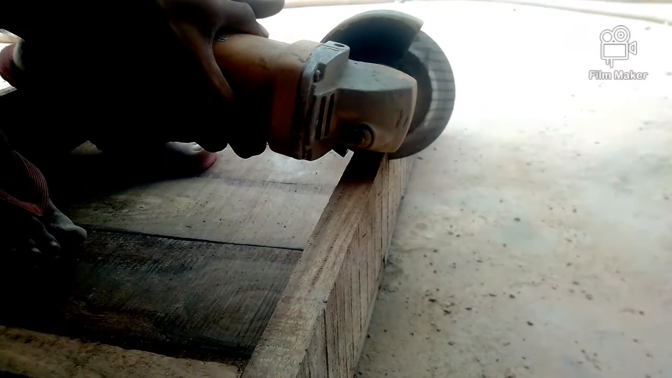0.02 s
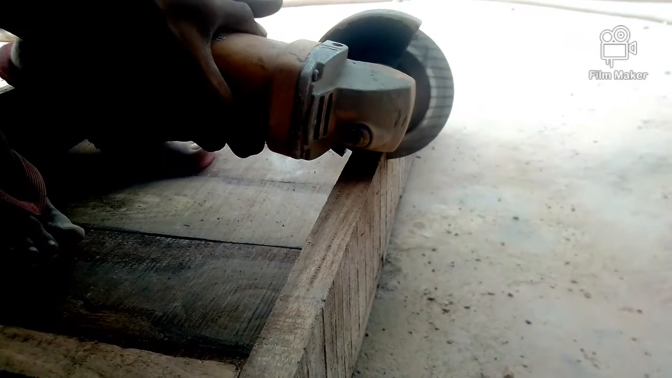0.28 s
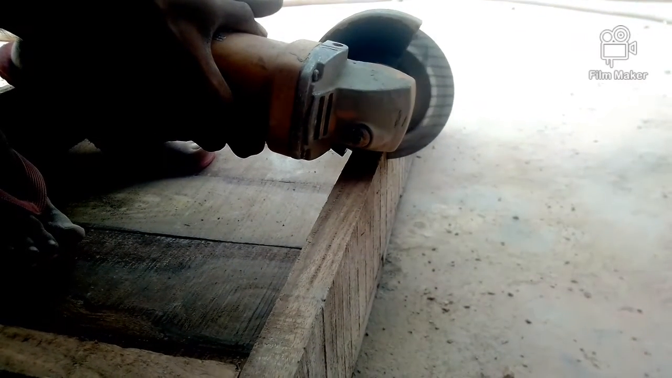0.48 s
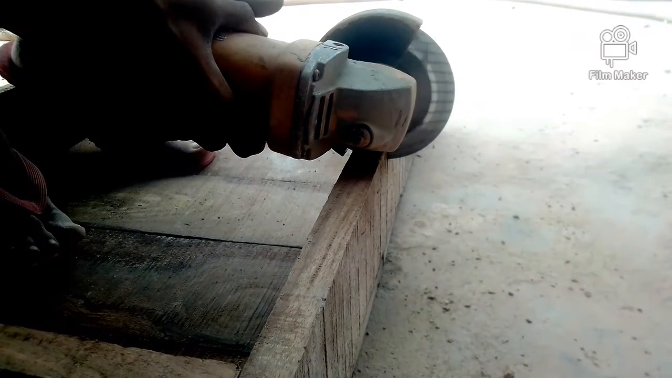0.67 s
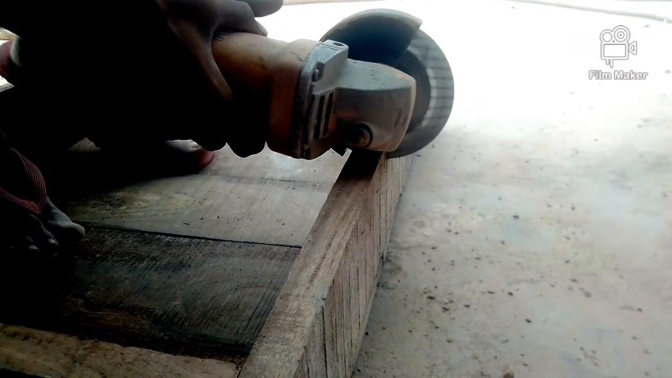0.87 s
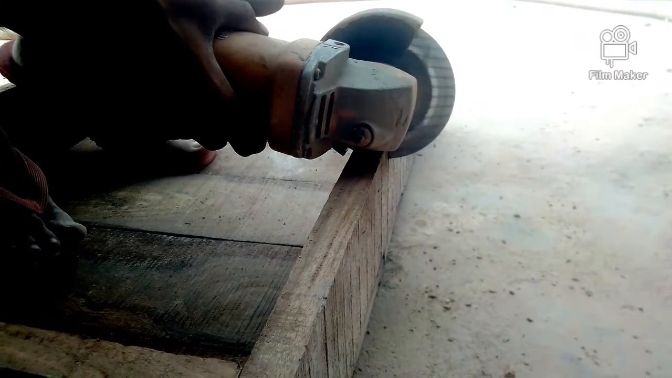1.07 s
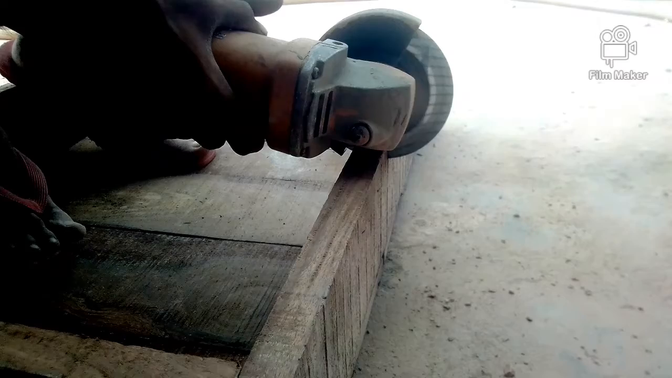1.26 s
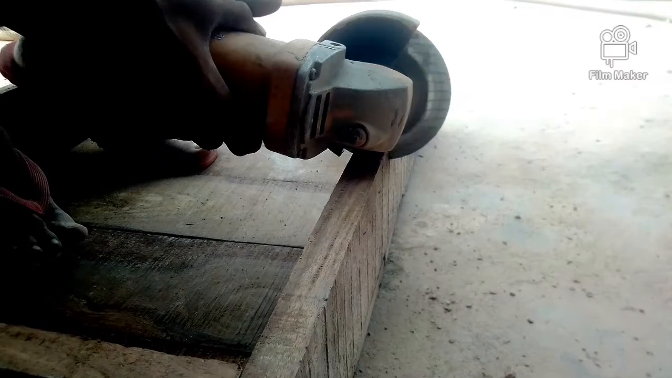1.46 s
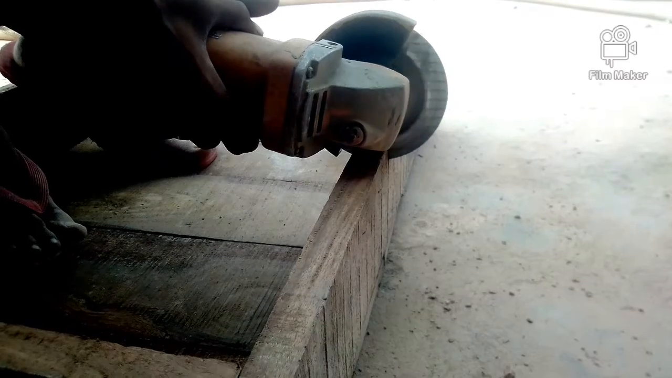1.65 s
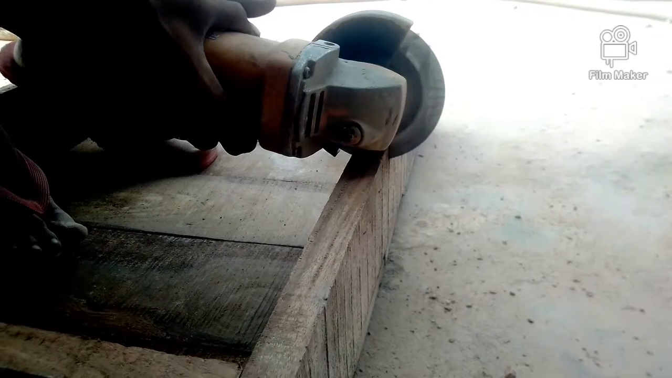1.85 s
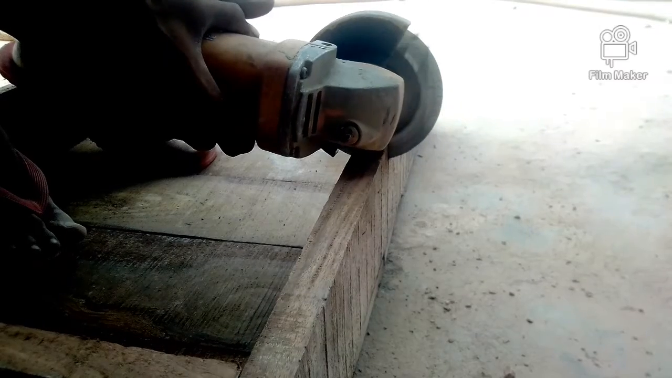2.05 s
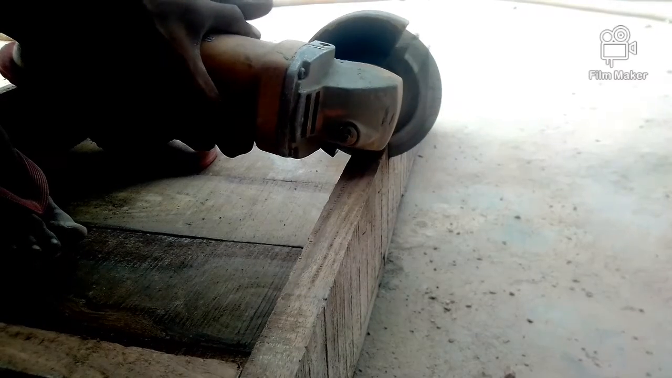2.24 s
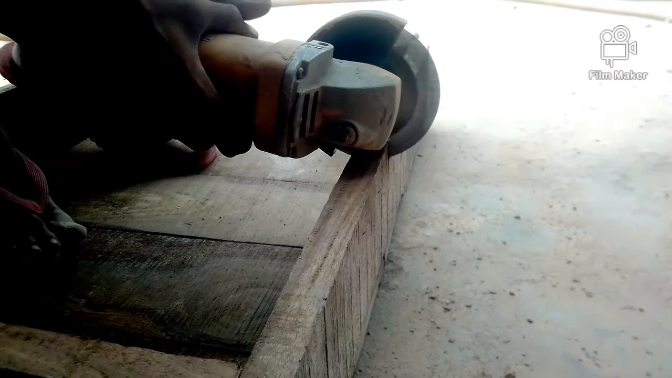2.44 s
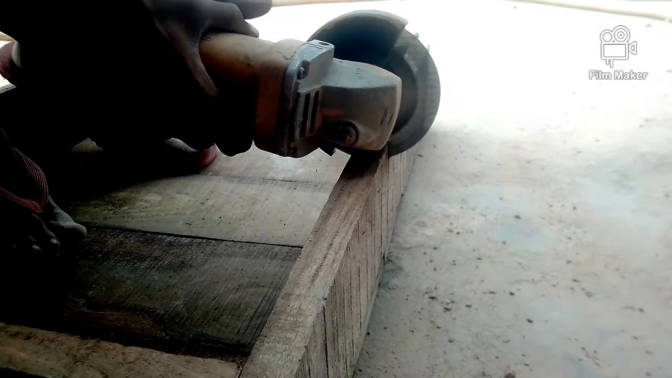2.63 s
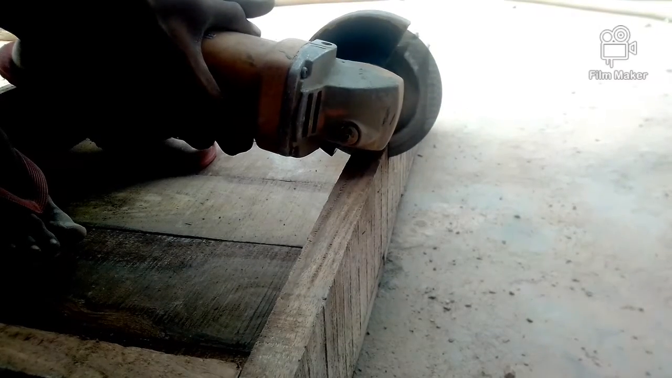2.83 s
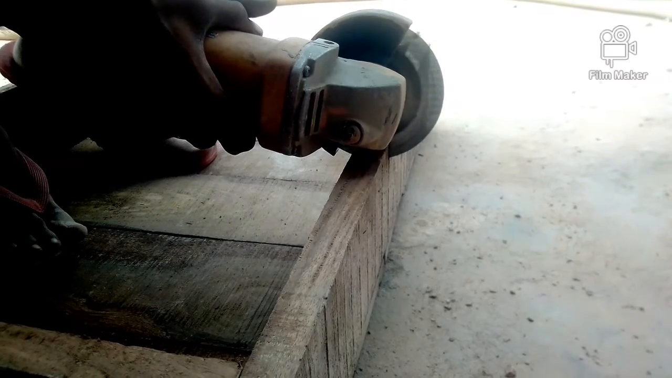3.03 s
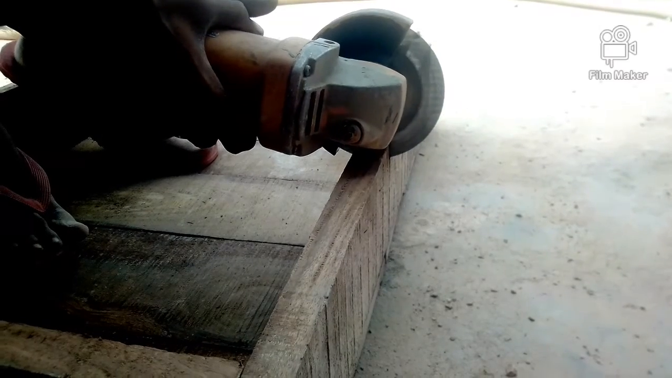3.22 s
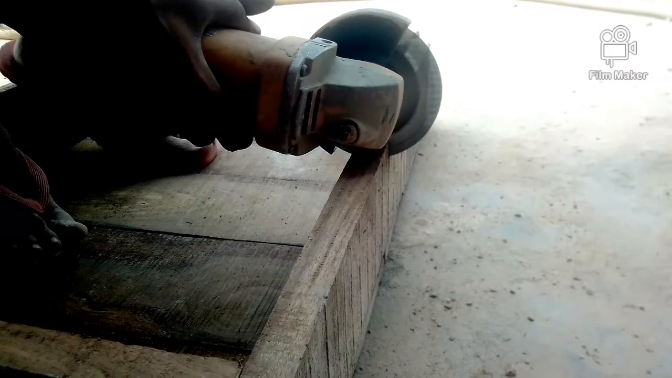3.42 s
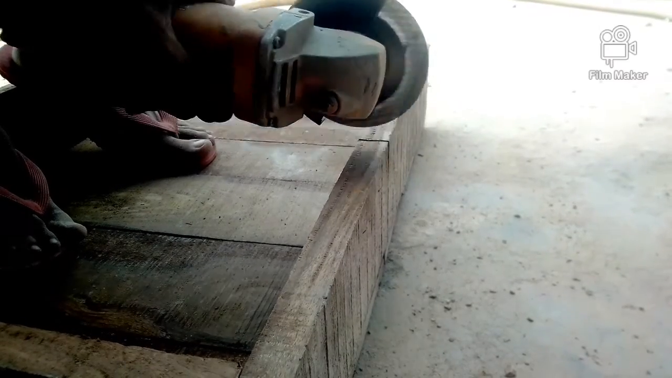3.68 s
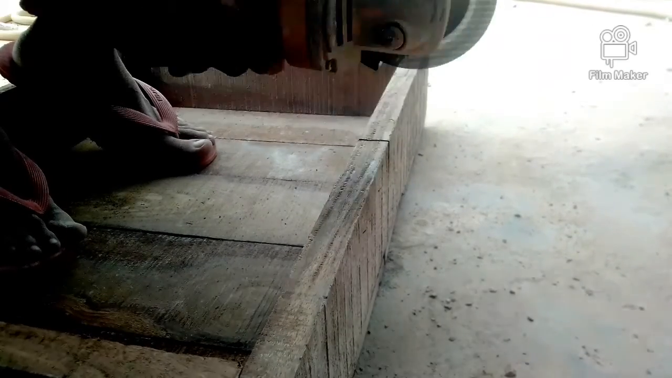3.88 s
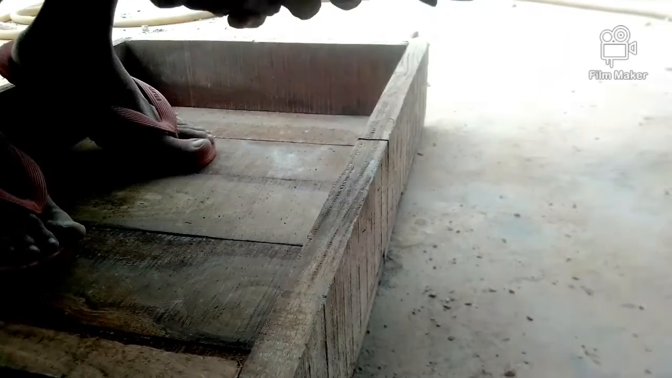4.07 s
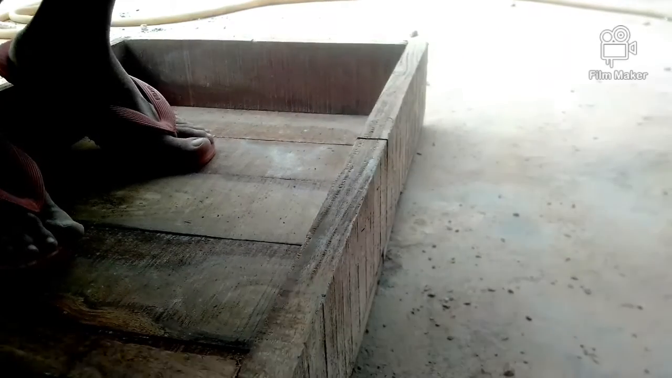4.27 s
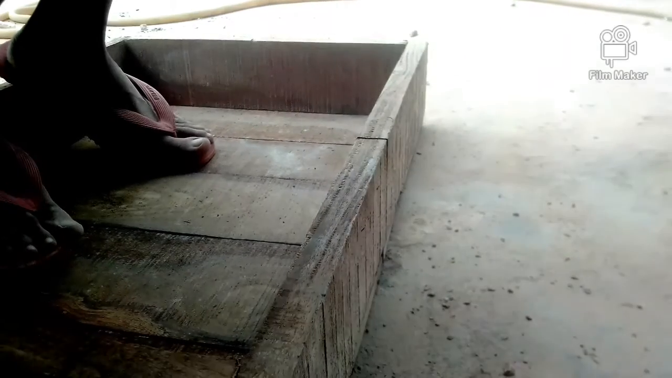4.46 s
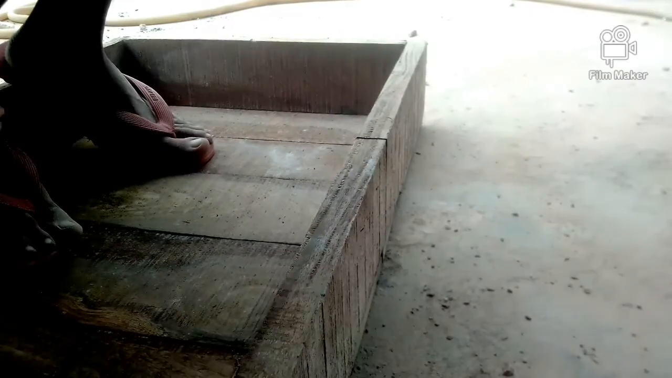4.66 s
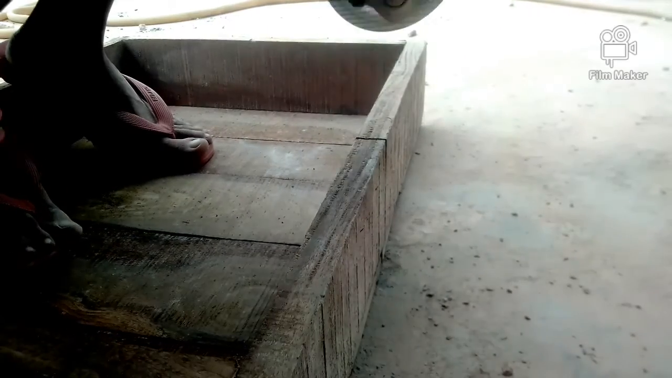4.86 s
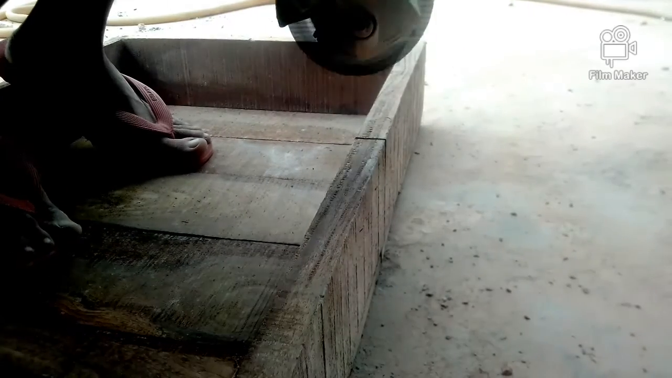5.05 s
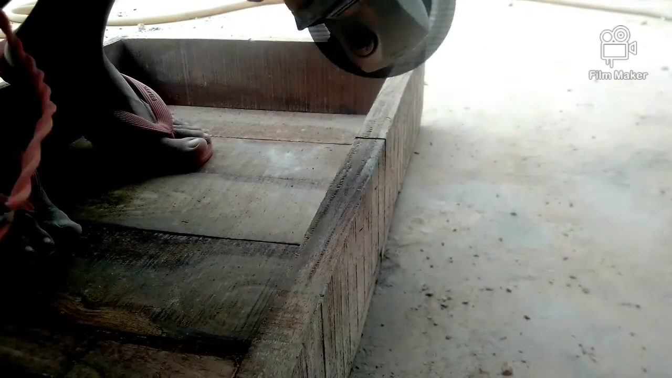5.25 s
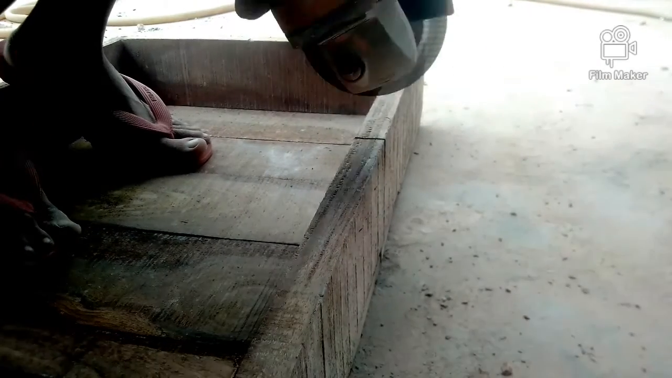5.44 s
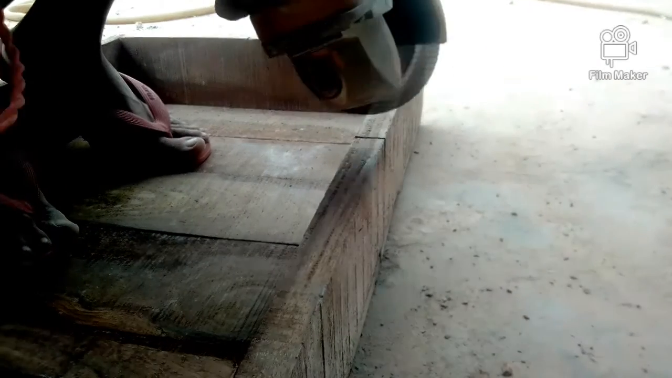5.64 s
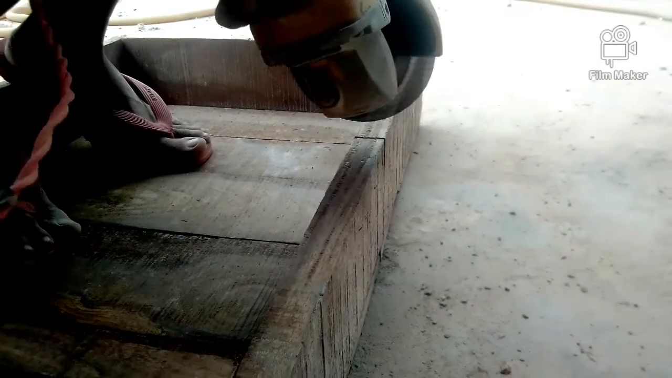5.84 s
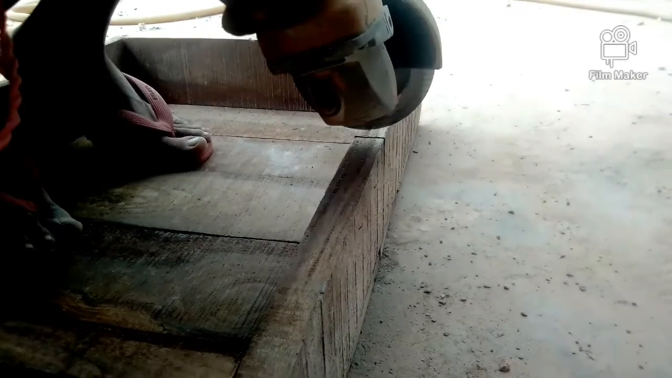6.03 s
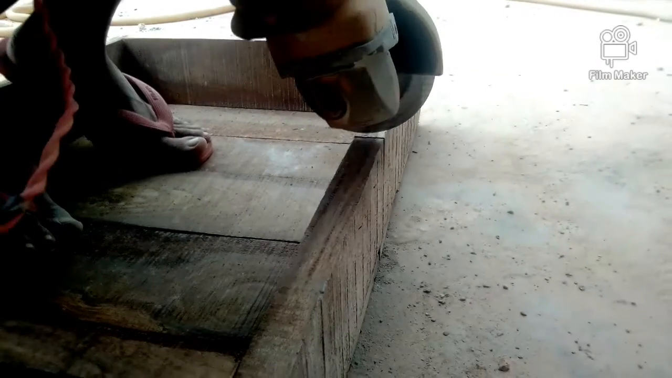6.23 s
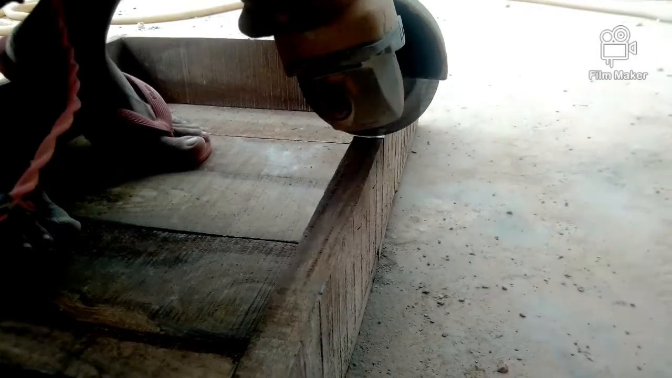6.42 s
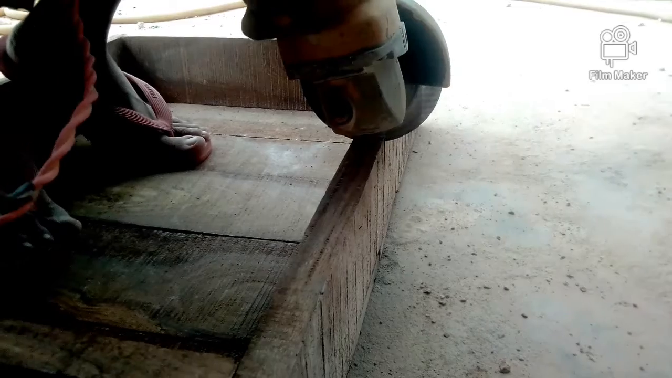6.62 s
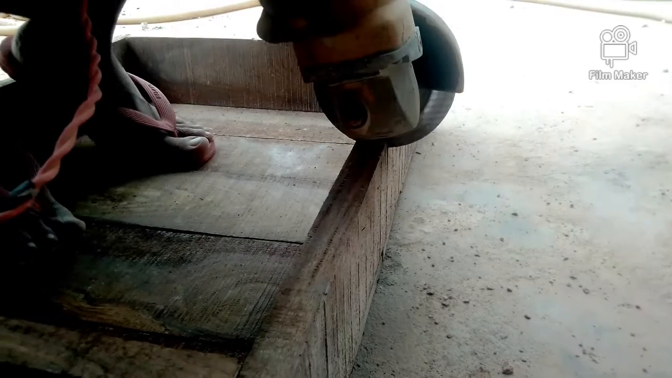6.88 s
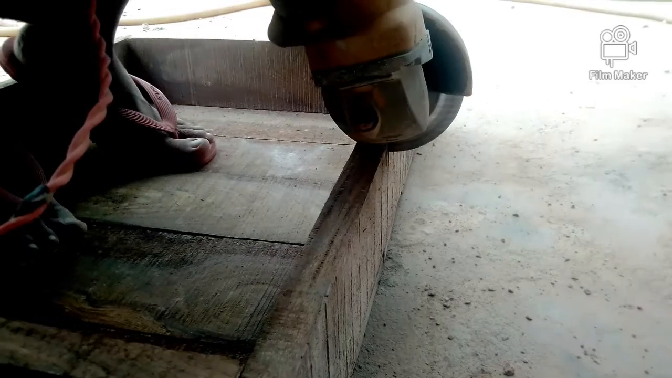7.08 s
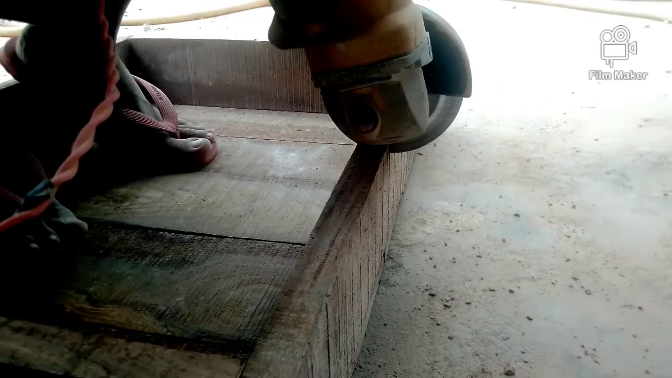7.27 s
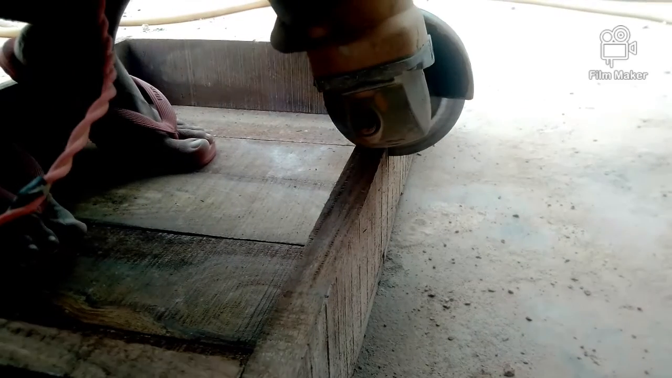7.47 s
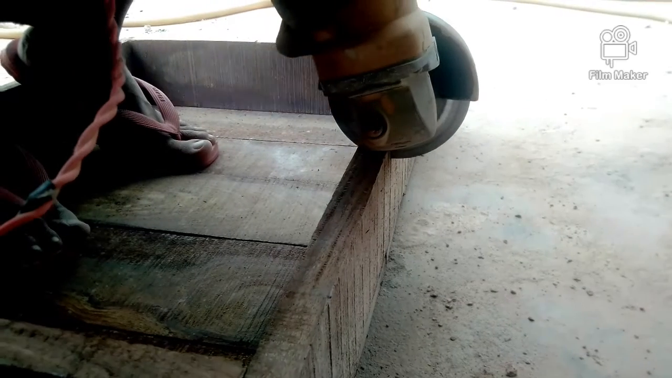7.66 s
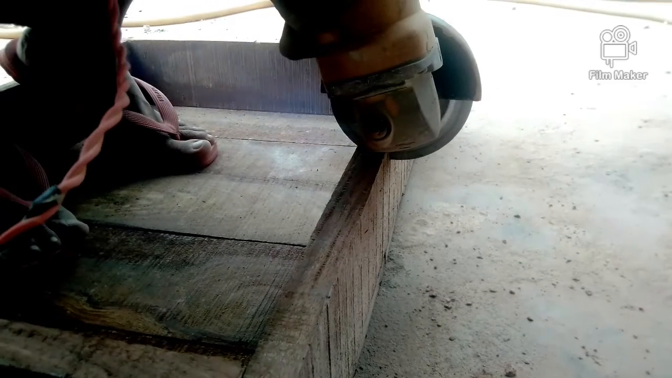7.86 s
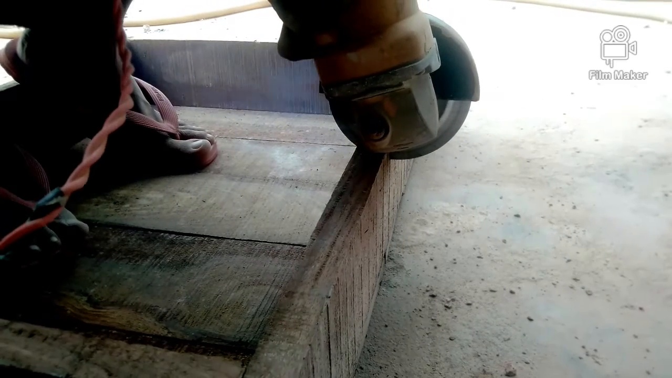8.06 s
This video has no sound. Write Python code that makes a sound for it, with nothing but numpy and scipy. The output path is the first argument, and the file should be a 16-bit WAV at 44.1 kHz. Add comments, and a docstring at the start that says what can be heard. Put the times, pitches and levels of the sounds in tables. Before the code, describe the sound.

Shrill, buzzing grinder cut in wood, a quick metallic ring as the disc lets go, airy free spinning, then a louder scraping bite sinking in pitch.

```python
"""An angle grinder finishes a cut in the edge of a wooden box, is lifted, runs free and bites again.
The rim meets the wood in nearly the same way each turn, so the scrape carries the shaft's multiples;
that force excites the modes of the steel disc and the thrum of the boards. Clean shaft tones swell as they
cross resonances of box and tool. Fan and gears hiss throughout as shaped noise, and the released disc
rings on as decaying sines. The input overloads softly."""
import sys
import numpy as np
from scipy import signal
from scipy.fft import rfft, irfft, next_fast_len
from scipy.io import wavfile
from scipy.ndimage import uniform_filter1d, map_coordinates

SR = 44100
rng = np.random.default_rng(int(sys.argv[2]) if len(sys.argv) > 2 else 0)


def master_out(mix):
    """Clip the mix to full scale and print it as 16-bit PCM to the path in sys.argv[1]."""
    frames = np.transpose(np.atleast_2d(mix))
    ceiling = np.clip(frames, -1, 1)
    pcm = np.round(ceiling * 32767).astype(np.int16)
    wavfile.write(sys.argv[1], SR, pcm)


N = 357210
T = np.arange(N) / SR

# contact of rim and wood, one table a cut: t/s, bite level/dB, shaft-tone level/dB
CUTS = [
    [(0, -14.5, -2.5), (.5, -13, -6.5), (1.02, -12.5, -5.5), (1.25, -14.5, -4), (1.55, -11, -1.5),
     (1.72, -12.5, -3), (2.1, -12.5, -2.5), (2.5, -14, -4), (2.85, -11, -6), (3.2, -10, -5.5),
     (3.42, -13.5, -4), (3.55, -11.5, -3.5), (3.68, -12.5, -21), (3.75, -13, -26), (3.775, -26, -40)],
    [(6.585, -32, -40), (6.605, -10.5, -34), (6.85, -9, -9), (7.08, -3, 10), (7.3, -5, 0), (7.6, -5, 3.5),
     (7.82, -8, 2), (8.1, -9, 0)],
]


def gain_of(db):
    """Amplitude ratio of a level difference in dB."""
    return 10 ** (np.asarray(db) / 20)


def evened(x):
    """Normalisation to rms 1."""
    return x / np.sqrt(np.mean(x ** 2) + 1e-20)


def white():
    """White noise: equal mean power at all frequencies, rms 1."""
    return rng.standard_normal(N)


def columns(tables, silent):
    """Piecewise-linear interpolation in time; outside the tables every column takes the value silent."""
    out = np.full((len(tables[0][0]) - 1, N), float(silent))
    for rows in tables:
        s, *values = np.transpose(rows)
        inside = (T >= s[0]) & (T <= s[-1])
        out[:, inside] = [np.interp(T[inside], s, v) for v in values]
    return out


def colour(x, points):
    """Spectral shaping: levels interpolated on a log-frequency axis weight the spectrum; rms 1 results."""
    f, db = np.transpose(points)
    size = next_fast_len(N)
    hz = np.fft.rfftfreq(size, 1 / SR)
    weight = gain_of(np.interp(np.log(hz + 1), np.log(f), db))
    spectrum = rfft(evened(x), size)
    return evened(irfft(spectrum * weight, size)[:N])


def ring(x, hz, width):
    """Resonance by heterodyning: shift the mode to zero, smooth twice, shift back; white noise keeps its rms."""
    turn = np.exp(2j * np.pi * np.cumsum(hz * np.ones(N)) / SR)  # hz may glide
    r = np.exp(-2.2 * np.pi * abs(width) / SR)
    norm = np.sqrt(2 * (1 - r * r) ** 3 / (1 + r * r))
    smoothed = signal.lfilter([1], [1, -2 * r, r * r], x / turn)
    return norm * (turn * smoothed).real


def flutter(hz):
    """Random modulation: white noise through a one-pole low-pass with its corner at hz, set to rms 1."""
    return evened(signal.lfilter([1], [1, -np.exp(-2 * np.pi * hz / SR)], white()))


def bumps(rows):
    """Sum of Gaussian rises in level (dB)."""
    return sum(db * np.exp(-((T - s) / length * 2) ** 2) for s, length, db in rows)


def grip(*stage_db):
    """Coupling to the wood: gain at four stages (deep in the slot, easing out, entering, bogged down)."""
    changes_s = (1.7, 2.3, 4, 5, 7.1, 7.4)  # three changes of grip, each from, to
    return gain_of(np.interp(T, changes_s, np.repeat(stage_db, 2)[1:-1]))


def tones(per_turn, angle):
    """Shaft harmonics: one sine of rms 1, in random phase, for each count of beats a turn."""
    phase = rng.random((len(per_turn), 1))
    return np.sqrt(2) * np.sin(2 * np.pi * (np.outer(per_turn, angle) + phase))


def pattern(rows, angle):
    """Periodic forcing: sines that repeat a whole number of times each turn."""
    per_turn, db = np.transpose(rows)
    return gain_of(db) @ tones(np.round(per_turn), angle)


def rim(angle, count=384):
    """Rotational periodicity: rim roughness is read once a turn and wears a little between turns."""
    fresh = rng.standard_normal((1400, count))  # turns, points round the rim
    worn = signal.lfilter([1], [1, -.955], fresh, axis=0)[100:]
    # slow variation round the rim is weakened, leaving the low multiples to the shaft tones
    worn = worn - 0.52 * uniform_filter1d(worn, size=24, axis=1, mode="wrap")
    return evened(map_coordinates(worn.ravel(), [angle * count], order=3))


def contact_force(angle):
    """Excitation at the contact: partly repeating roughness, partly fresh noise, plus rim and gear patterns."""
    # the harder the disc is pressed, the more alike its turns:
    # t/s, share of the rough force's power that repeats each turn (0-1)
    repeat = [(0, .6), (1.2, .6), (1.4, .75), (1.7, .7), (2.1, .3), (3.8, .2), (6.6, .3), (7, .55),
              (7.3, .8), (8.1, .85)]
    # rim patterns that stand out while the disc sits steady in the slot: beats a turn, level/dB
    seated = [(7, -18), (9, -17.5), (12, -16), (15, -22.5), (20, -22), (22, -20.5), (24, -16), (28, -22),
              (29, -22.5), (31, -14.5), (32, -28), (34, -32.5), (38, -24), (44, -19), (46, -25), (47, -28),
              (48, -14), (54, -15)]
    # gear and rim patterns that stand out as the motor bogs down: beats a turn, level/dB
    bogging = [(20, -12.5), (28, -30), (29, -16.5), (27, -25), (30, -16), (32, -33), (35, -23), (39, -17),
               (40, -19.5), (45, -20), (47, -27), (49, -21)]
    share = np.interp(T, *np.transpose(repeat))
    force = np.sqrt(share) * rim(angle) + np.sqrt(1 - share) * white()
    force += np.interp(T, (7.12, 7.55), [0, 1]) * pattern(bogging, angle)  # grow between these times (s)
    force += np.interp(T, (1.06, 1.21), [1, 0]) * pattern(seated, angle)  # fade between these times (s)
    return force


def rasp(force):
    """Friction noise: the contact force with the broad spectrum of scraping."""
    # scrape spectrum: f/Hz, relative level per Hz/dB
    scrape = [(300, -95), (600, -10.5), (1100, -29.5), (1650, -13), (2500, -6.5), (3100, 0), (4000, 5),
              (4900, 2), (5600, -14.5), (6700, -13), (9000, -13), (12000, -47)]
    return grip(-2, -5, -4, -2) * colour(force, scrape)


def fizz(snag_db):
    """Chip noise: amplitude-modulated noise with a spectrum of its own, raised further at each snag."""
    # chip spectrum: f/Hz, relative level per Hz/dB
    chip_spectrum = [(3530, -54), (6000, 8.5), (6800, -5), (8680, 1), (9480, -2), (12200, -1.5),
                     (15700, -12)]
    snag_fizz = 0.89  # extra dB of fizz for each dB of snag
    chips = white() * gain_of(1.4 * flutter(hz=400) + 1.24 * flutter(hz=7.1))
    return grip(-16, -15, -12.5, -7.5) * gain_of(snag_fizz * snag_db) * colour(chips, chip_spectrum)


def boards(force):
    """Forced vibration of the box: the contact force shaped by the low spectrum of the boards."""
    # thrum spectrum: f/Hz, relative level per Hz/dB
    thrum = [(18, -82), (30, -69), (125, -22), (172, -12), (300, 1), (391, -2), (460, -10.5), (590, -17),
             (839, -47), (1000, -16), (1300, -23), (2200, -120)]
    return grip(-24.5, -28.5, -38, -29.5) * colour(force, thrum)


def disc(bitten_force, speed):
    """Modal resonance of the steel disc; spin stiffens some modes and raises their frequencies."""
    # f/Hz at 134 turns/s, rise/Hz per extra turn/s, nominal width/Hz,
    # relative level/dB: deep in the slot, easing out, entering fresh wood, bogged down
    modes = [(1100, 0, 140, -17, -21, -26, -24), (1490, 0, 50, -29, -25, -22, -29),
             (2850, 0, 45, -19, -23, -16, -20), (3228, 0, 45, -17, -12, -11, -14),
             (3378, 0, 60, -19, -21, -20, -13), (3778, 0, 50, -18, -10, -10, -15),
             (4035, 0, 45, -18, -15, -17, -26), (4160, 0, 70, -20, -7, -17, -22),
             (4700, 0, 38, -11, -5, -15, -19), (4980, 0, 40, -22, -14, -17, -18),
             (5200, 0, 150, -16, -17, -22, -20), (5785, 3, 45, -26, -18, -5, -8),
             (6207, 0, 40, -30, -21, -17, -15), (7090, 0, 50, -30, -34, -22, -25),
             (7262, 1.2, 28, -17, -10, -24, -25), (7650, 0, 35, -42, -36, -25, -36),
             (8160, 0, 90, -29, -38, -36, -36), (8490, 2.8, 45, -45, -25, -19, -16),
             (8830, 0, 60, -38, -31, -24, -27), (10030, 0, 45, -34, -40, -32, -36),
             (10580, 0, 150, -30, -23, -26, -30), (11400, 0, 50, -36, -27, -28, -34),
             (11900, 4, 70, -31, -28, -23, -22)]
    rings = sum(ring(bitten_force * grip(*db), hz + stiffen * (speed - 134), width)
                for hz, stiffen, width, *db in modes)
    return gain_of(-1.96) * rings


def cut(speed, angle):
    """Forced excitation: one contact force drives rasp, boards and disc, with the fizz of chips added."""
    # the rim snags, a brief louder and fizzier scrape: t/s, full width at 1/e of the dB rise/s, rise/dB
    snags = [(.88, 0.079, 0.5), (1.4, .1, 3), (1.52, 0.065, 1.5), (1.85, 0.11, 1), (2.27, 0.09, 4),
             (2.43, 0.033, 2.5), (3.1, .08, 1), (3.61, 0.13, 6.5), (3.725, 0.058, 6.5), (6.7, 0.097, 2)]
    snag_db = bumps(snags)
    force = contact_force(angle)
    steady = uniform_filter1d(gain_of(columns(CUTS, silent=-90)[0]), 300)
    bite = steady * gain_of(snag_db + 1.3 * flutter(hz=25.3))
    scraping = bite * (rasp(force) + fizz(snag_db))
    return scraping + steady * boards(force) + disc(force * bite, speed)


def beats(speed, angle):
    """Resonant amplification: tones of off-balance disc and gear teeth swell as they cross a resonance."""
    # tones locked to the shaft: beats a turn, relative level/dB
    shaft_tones = [(1, -40), (1.5, -48.5), (2, -42.5), (3, -35), (6, -41), (9, -30.5), (10, -20), (11, -26),
                   (12, -34)]
    # resonances of box and tool: f/Hz, full width at half amplitude/Hz, peak gain/dB
    body = [(135, 19, 0), (260, 67, 1), (306, 22, -6.5), (380, 24, 1.5), (589, 27, 2.5), (1047, 45, 1.5),
            (1129, 46, 3), (1506, 230, -10)]
    per_turn, db = np.transpose(shaft_tones)
    per_turn = np.round(2 * per_turn) / 2  # whole or half beats
    hz = np.outer(per_turn, speed)
    lift = sum(gain_of(top_db) / (1 + (2 * (hz - f) / width) ** 2) for f, width, top_db in body)
    lift[per_turn < 7] *= grip(4, 3, -21, -11.5)  # the low tones follow the grip
    contact = uniform_filter1d(gain_of(columns(CUTS, silent=-90)[1]), 1000)
    level = contact * gain_of(1.5 * flutter(hz=9))
    return level * (gain_of(db) @ (lift * tones(per_turn, angle)))


def motor(speed):
    """Broadband noise with resonances: lumpy fan and gear hiss, narrow rings and a whine tied to the shaft."""
    # hiss spectrum: f/Hz, relative level per Hz/dB
    hiss = [(30, -30), (80, -25), (150, -30), (300, -26), (600, -22.5), (1000, -13), (2100, -14),
            (3000, -6.5), (3900, 1), (5900, -4.5), (7200, -15.5), (8400, -22.5), (10700, -20.5),
            (13000, -30.5), (15700, -32)]
    # rings of housing and free disc: f/Hz, nominal width/Hz, middle level against the hiss/dB
    housing = [(3320, 200, -13), (3774, 20, -14), (4060, 50, -20), (4735, 30, -22), (5050, 300, -13),
               (8980, 25, -35), (10414, 25, -35), (10600, 30, -25), (11100, 200, -34), (11900, 90, -34)]
    # brief swells of the hiss: t/s, full width at 1/e of the dB rise/s, rise/dB
    swells = [(4.53, 0.041, 3.5), (4.66, 0.034, 2.5), (4.78, 0.09, 1.5), (5.69, 0.034, 2), (6.21, 0.062, 3)]
    free_db, buried_db = -16, -20.5  # running free and during a cut
    free_s = (3.72, 3.8, 6.55, 6.9)  # lifted clear from, to; pressed in again from, to
    rattle = evened(white() * gain_of(1.7 * flutter(hz=123) + 0.65 * flutter(hz=12)))
    rings = sum(gain_of(db + 2.2 * flutter(hz=2.0)) * ring(rattle, hz, width) for hz, width, db in housing)
    rings += gain_of(-31.5) * ring(rattle, 6 * speed, 12)  # thin whine at six beats a turn
    level_db = np.interp(T, free_s, [buried_db, free_db, free_db, buried_db]) + bumps(swells)
    return gain_of(level_db) * (colour(rattle, hiss) + rings)


def ring_on():
    """Free decay: modes of the released disc, no longer damped by the wood, die away exponentially."""
    # f/Hz, level/dB, t60/s
    free_modes = [(4705, -8, 0.29), (7265, -20, 0.41)]
    let_go_s = 3.735  # the wood releases the disc
    t = np.maximum(T - let_go_s, 0)
    onset = np.minimum(t / .012, 1)
    return onset * sum(gain_of(db - 60 * t / t60) * np.sqrt(2) * np.sin(2 * np.pi * hz * t)
                       for hz, db, t60 in free_modes)


def scene():
    """Superposition: all sources share one shaft and sum alike into two channels."""
    # shaft speed, sagging under load and running up when free: t/s, speed/(turns per s)
    shaft = [ (0, 100.5), (.6, 99.1), (1.08, 99.1), (1.4, 103.2), (1.54, 104.3), (1.75, 103.7),
             (2.25, 121.9), (2.6, 131.3), (2.9, 135.2), (3.3, 133.7), (3.72, 134), (3.9, 151), (4.5, 159.5),
             (5.4, 164.3), (6.55, 164.6), (6.65, 153), (6.92, 147.8), (7.2, 138.6), (7.55, 128.2),
             (7.75, 123.4), (8, 112.4), (8.1, 110.8)]
    speed = np.interp(T, *np.transpose(shaft))
    angle = np.cumsum(speed) / SR  # turns
    mono = cut(speed, angle) + beats(speed, angle) + motor(speed) + ring_on()
    return np.tile(mono, (2, 1))


def record(dry):
    """Soft saturation rounds the tallest peaks; a high-pass thins the bass and a low-pass limits the band."""
    ceiling, low_cut_hz, edge_hz = 0.71, 203, 15750  # ceiling in full-scale amplitude
    rounded = dry / (1 + abs(dry / ceiling) ** 6) ** (1 / 6)
    thin = signal.sosfilt(signal.butter(2, low_cut_hz, "high", fs=SR, output="sos"), rounded)
    low_pass = signal.firwin(511, edge_hz, window=("kaiser", 9), fs=SR)
    return signal.oaconvolve(thin, low_pass[None], "same")


dry = scene()
out = record(dry)
master_out(out)
```